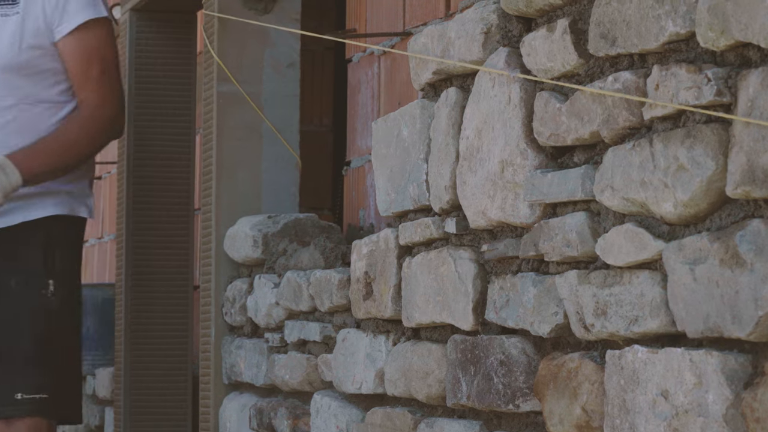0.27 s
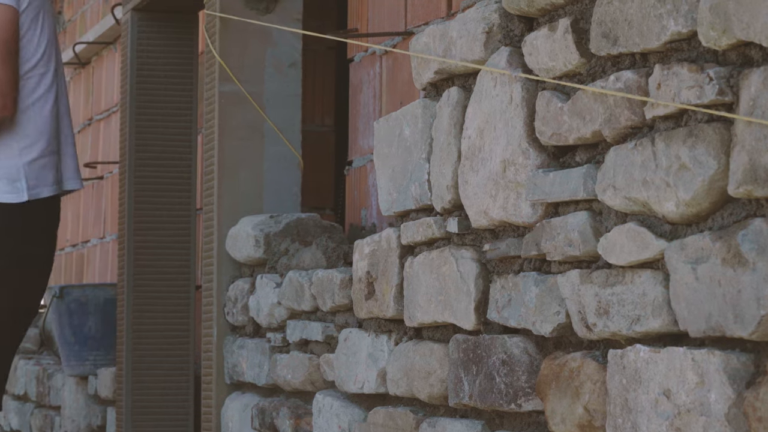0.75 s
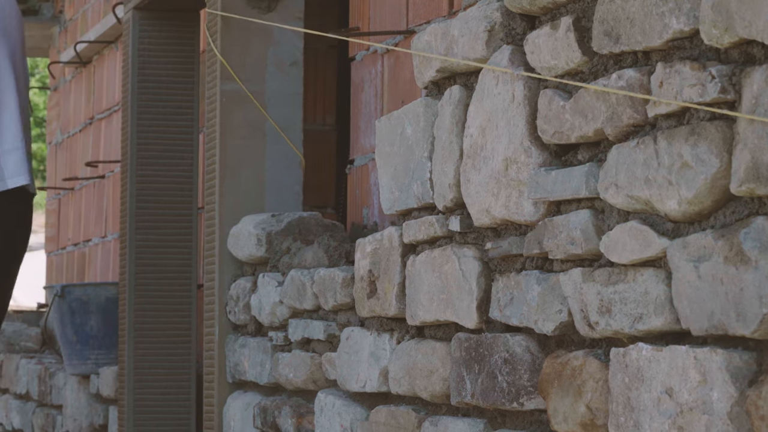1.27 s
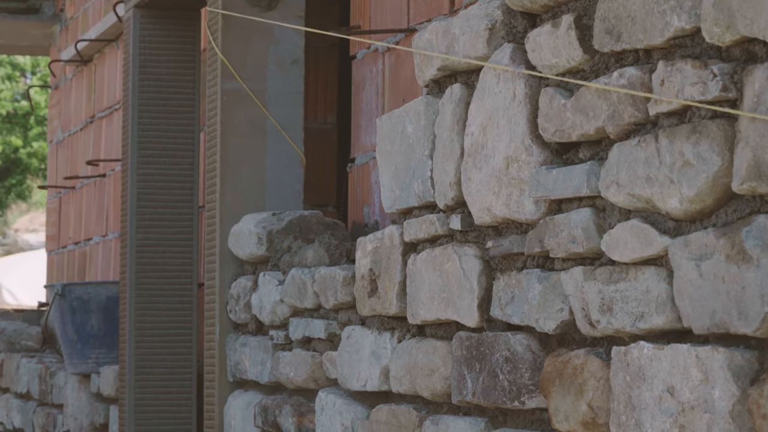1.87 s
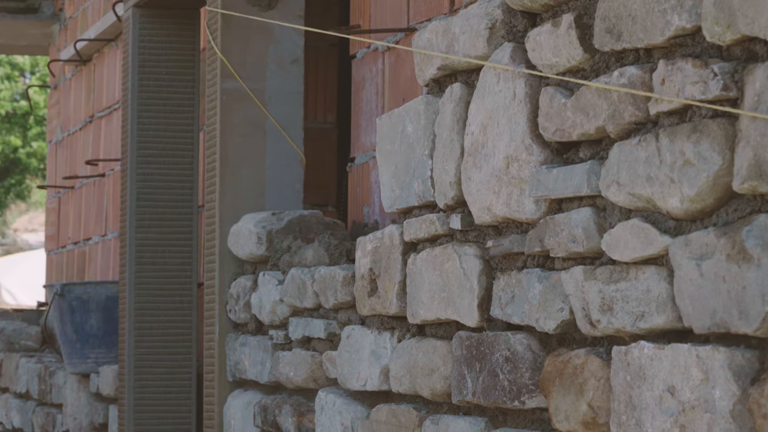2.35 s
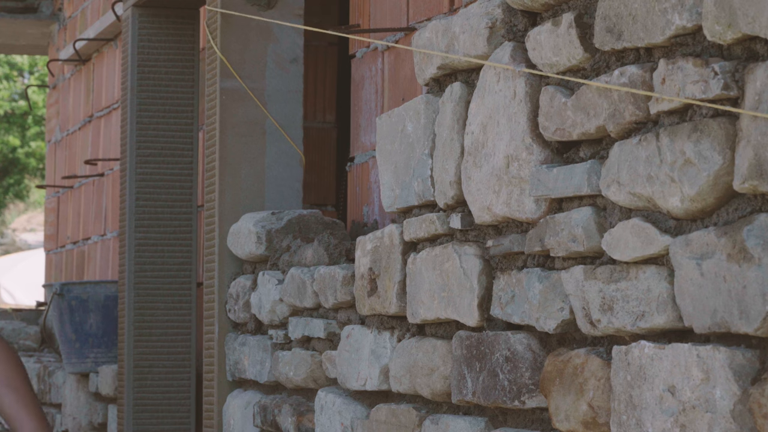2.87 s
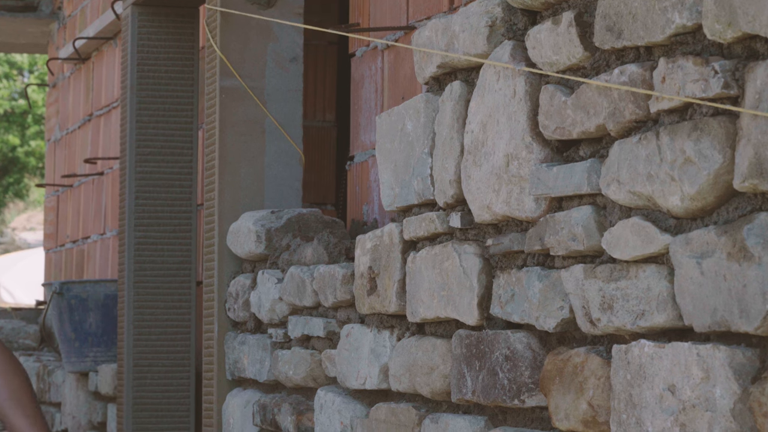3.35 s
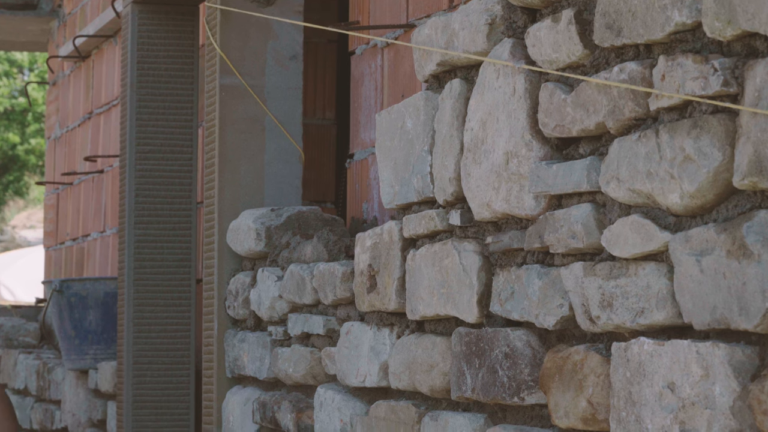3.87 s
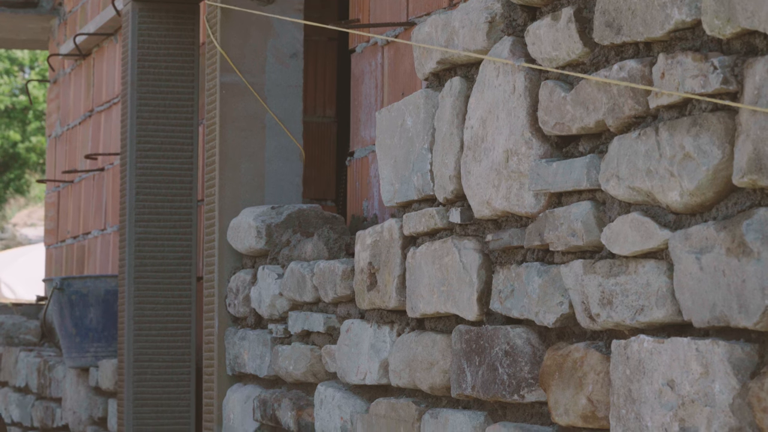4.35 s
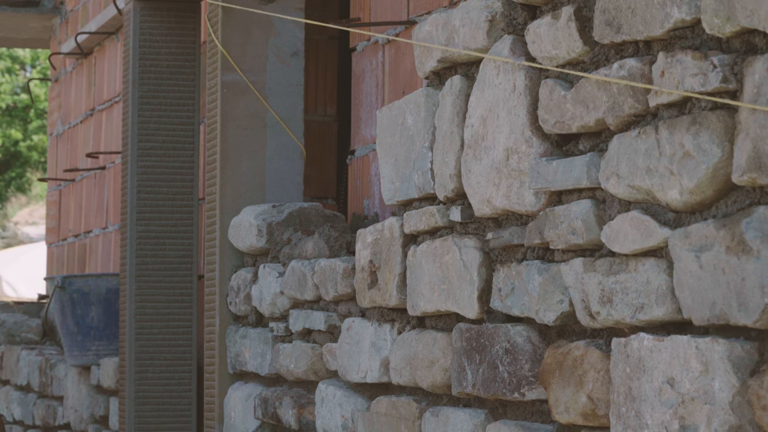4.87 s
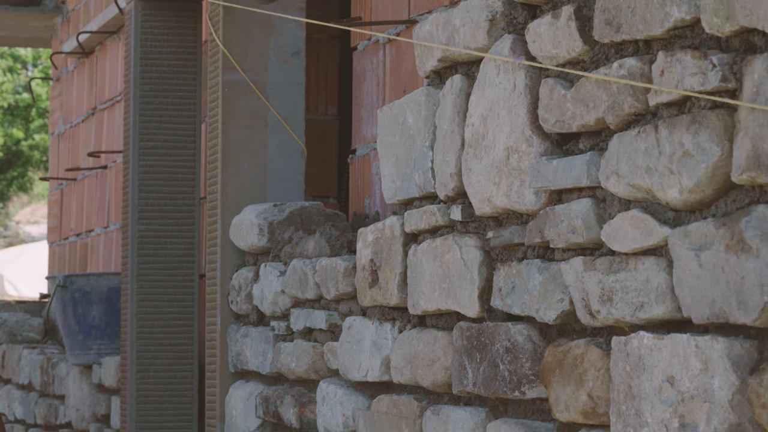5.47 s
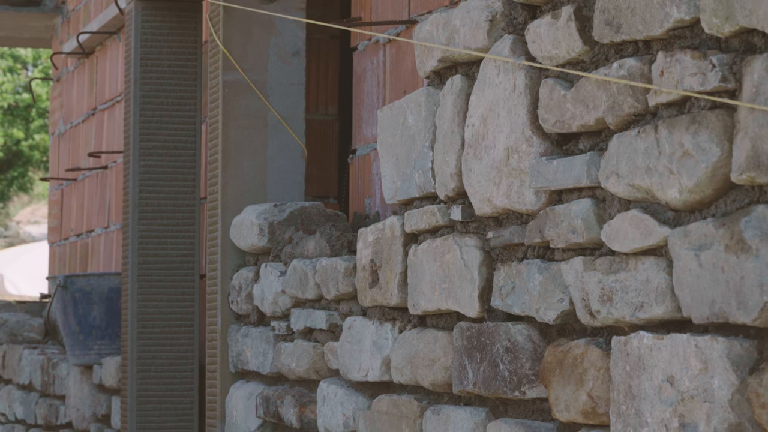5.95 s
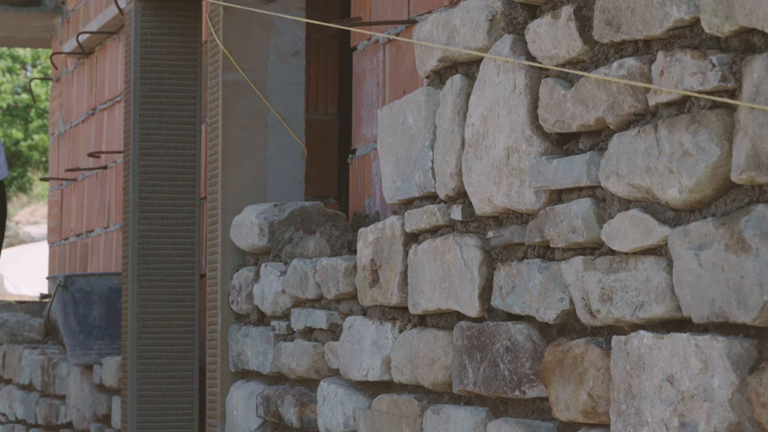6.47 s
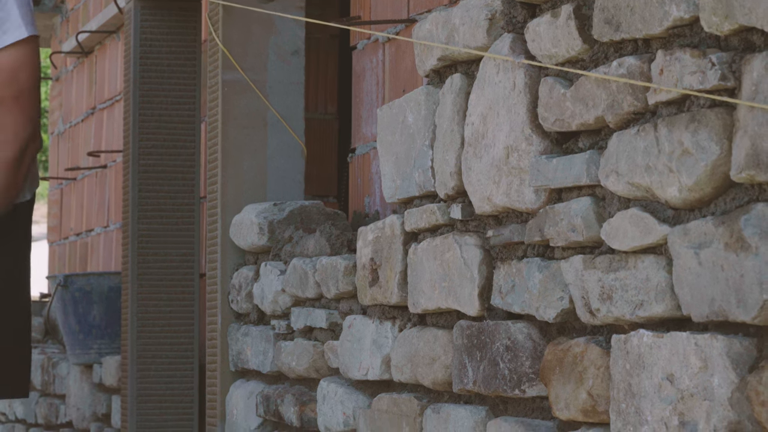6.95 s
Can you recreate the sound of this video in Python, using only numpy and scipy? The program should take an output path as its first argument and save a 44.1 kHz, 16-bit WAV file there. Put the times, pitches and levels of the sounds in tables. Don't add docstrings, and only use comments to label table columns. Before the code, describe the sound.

Quiet outdoor site hush, then heavy stones crack and thump sharply together, with gritty scrapes, chattering chips, pattering sand and small trowel clinks.

```python
import sys
import numpy as np
from scipy import signal
from scipy.fft import rfft, irfft, next_fast_len
from scipy.io import wavfile
from scipy.ndimage import uniform_filter1d, map_coordinates

SR = 44100
rng = np.random.default_rng(int(sys.argv[2]) if len(sys.argv) > 2 else 0)


def makeup_ratio(level_db):
    decades = np.asarray(level_db, float) / 20
    return 10 ** decades


def master_out(mix):
    frames = np.transpose(np.atleast_2d(mix))
    ceiling = np.clip(frames, -1, 1)
    pcm = np.round(ceiling * 32767).astype(np.int16)
    wavfile.write(sys.argv[1], SR, pcm)


N = 317961
T = np.arange(N) / SR

# (frequency [Hz], level [dB])
SITE_COLOUR = [(15, -79.5), (25, -33.5), (156, -7), (188, -6.5), (1110, -4), (1760, -3), (2240, -6.5),
               (4170, -9), (6410, -9.5), (7960, -10), (15600, -14)]
# (frequency [Hz], level [dB rms])
WHINES = [
    (1774, -74),
    (7698, -75),
    (9469, -84),
    (3545, -80),
]
# (frequency [Hz], likeness [-1 to 1]),
# (frequency [Hz], left over right [dB]), left lead [ms]
SITE_STEREO = [(60, 0.7), (130, 0.94), (290, 1), (640, 0.61), (1410, -0.093), (3100, -0.39), (6820, -0.08),
               (15000, 0.0094)], [(100, 0.036), (10000, 0.18)], 0
PILE_STEREO = [(100, 1.5), (600, 1.5), (1200, 0.67), (3000, 0.37), (15000, 0.08)], [(300, 0.5), (700, 1.5),
               (1300, 4.5), (2400, 2), (5000, 2.5), (15000, 0.5)], 0.094
SAND_STEREO = [(100, 1), (600, 1), (1500, 0.88), (5000, 0.098), (15000, 0.14)], [(60, 1.8), (110, 0.5),
               (200, 1.2), (380, 2.5), (700, 5.5), (1290, 20.4), (2380, 3.1), (4400, 1.0), (8120, 5.3),
               (15000, 3.3)], 0.197

# (time [s], held [s], level [dB], grit [dB], settling t60 [s])
PULLS = [(0.33, 0.13, -55, 2.5, 2.8), (0.89, 0.012, -45.5, 1, 0.25), (1.56, 0.16, -58.5, 9, 1.1),
         (1.93, .02, -53, -2, 0.27), (2.069, 0.06, -51, 6, 0.44), (2.6, 0.27, -54, 2, 0.74),
         (2.92, 0.1, -33.5, -9, 0.17), (3.133, .13, -32, -13.5, 0.3), (3.369, 0.056, -13, -7, 0.88),
         (3.656, .13, -17, -3.5, 0.31), (3.85, 0.021, -39, -19, 3.1), (4.6, 0.054, -23, -13.5, 0.24),
         (4.86, 0.13, -31.5, -10.5, 0.4), (4.97, 0.011, -20, -12.5, 0.2), (5.11, 0.27, -46.5, -8.5, .5),
         (5.319, 0.026, -8.5, -26, 0.14), (5.38, 0.03, -38, -6, .3), (5.46, 0.015, -30.5, 0, 0.44),
         (5.6, 0.27, -45, -3.5, 0.62), (5.88, 0.037, -29, -29, 0.21), (5.94, 0.022, -28.5, -26, 0.3),
         (6.15, 0.48, -48, -6, 1), (6.8, 0.23, -43.5, -5, 1.26)]
# (time [s], peak level [dB], grit [dB], weight [dB])
LANDINGS = [(0.322, -33.5, -19, -6), (1.674, -36, -17, -9), (2.95, -30, -14, -16),
            (3.001, -32.5, -10.5, 11.5), (3.037, -29.5, -24, 1.5), (3.156, -27.5, -31, 2),
            (3.179, -30.5, -28, 6), (3.359, 1.5, -12, -11.5), (3.402, -7.5, -7.5, -6), (3.475, -15, -9, -8),
            (3.638, -14.5, -40, -1.5), (3.669, -23, -8, -8), (3.676, -9, -6.5, -14),
            (3.775, -4.5, -15.5, -37), (3.788, -25, -14.5, -26), (4.597, -14, -23, -6.5),
            (4.629, -21.5, -31, -1), (4.676, -20, -40, -2.5), (4.793, -20.5, -36, -3),
            (4.885, -23, -13.5, -5.5), (4.965, -18.5, -31, 2.5), (5.112, -22, -22, -28),
            (5.14, -25.5, -18, 0.5), (5.201, -27.5, -30, -12), (5.305, -17, -33, -17),
            (5.318, -3.5, -14.5, -12.5), (5.326, -7, -12, -22), (5.358, -14, -12, -27),
            (5.429, -15.5, -37, -10), (5.879, -27.5, -31, 7.5), (5.941, -20.5, -22, -2)]
# (time [s], peak level [dB], grit [dB], t60 [s])
LIGHT_TAPS = [(0.141, -40.5, -28, 0.27), (0.177, -37, -10, 0.25), (0.462, -39, -26, 0.51),
              (0.569, -47, -15, 0.24), (0.88, -38, -8, 0.61), (1.081, -41.5, -8, 0.68),
              (1.558, -39, -27, 0.21), (1.609, -33.5, -16.5, 0.32), (1.922, -35.5, -6, 0.26),
              (2.648, -49.5, -2, 1), (2.761, -40, -25, 0.58), (3.229, -33.5, -8.5, 0.44),
              (3.546, -18, -13, 0.2), (4.755, -36.5, -7.5, 0.52), (5.257, -33, -18.5, 0.93),
              (6.36, -53.5, 7.5, 0.72), (6.434, -43.5, 3, 0.23), (6.587, -48.5, 1.5, 0.4),
              (6.753, -48, 0, 1), (6.856, -26, -12, 0.073), (7.055, -33.5, 0.5, 0.39),
              (7.188, -36, -8, 0.24)]
# (frequency [Hz], level [dB])
STONE_COLOUR = [(30, -89), (130, -46), (220, -9), (320, -7.5), (500, -4.5), (800, -2), (1150, -4.5),
                (1600, -12), (2300, -22), (3500, -42.5), (9000, -55)]
# (frequency [Hz], level [dB])
GRIT_COLOUR = [(100, -86), (900, -23), (1900, 7.5), (2600, 5), (3200, 2), (5500, 3), (7500, -6),
               (10000, -11.5), (16000, -22.5)]
# (frequency [Hz], level [dB])
THUMP_COLOUR = [(30, -80), (100, -45), (180, -22), (245, -1), (330, 0), (480, -20), (1000, -50)]
# (time [s], peak level [dB], stone frequency [Hz], t60 [s])
CLEAN_KNOCKS = [(0.175, -39, 926, 0.096), (0.322, -38, 502, 0.13), (0.569, -44, 930, 0.2),
                (0.88, -36.5, 1090, 0.11), (1.675, -39, 340, 0.082), (1.92, -35.5, 902, 0.1),
                (3.155, -23.5, 910, 0.064), (3.207, -19, 870, 0.049), (3.36, 0, 760, 0.062),
                (3.674, -10, 927, 0.1), (4.598, -22, 1086, 0.17), (4.678, -18, 926, 0.096),
                (4.791, -22.5, 952, 0.068), (4.967, -12.5, 812, 0.065), (5.32, -6, 842, 0.11),
                (5.428, -17.5, 800, 0.08), (5.879, -20, 890, 0.1), (5.94, -12, 754, 0.063),
                (6.171, -32, 766, 0.035), (6.855, -19.5, 960, 0.03), (6.872, -25, 1080, 0.024),
                (6.909, -38, 824, 0.085), (6.951, -30, 950, 0.04), (7.023, -37, 480, 0.078),
                (5.943, -21.5, 331, 0.094), (5.966, -17.5, 960, 0.044), (5.886, -30, 327, .15),
                (3.398, -9, 460, .04), (4.715, -23, 805, 0.056), (4.985, -10, 612, 0.056),
                (5.003, -24, 890, 0.046), (5.4, -19, 450, 0.1), (5.942, -17.5, 562, 0.099),
                (0.91, -39, 890, .06), (0.943, -37, 855, .06), (3.745, -13, 890, 0.077),
                (5.258, -35, 890, .04)]

# (time [s], level [dB], shake [s], t60 [s])
GROUND_SHAKES = [
    (3.361, -30, 0.024, 0.17),
    (0.33, -57, 0.036, .3),
    (3.36, -35.5, .05, 1.9),
    (3.67, -46, .15, 1.4),
    (4.6, -52.5, .5, 1),
    (5.32, -45, 0.025, 1.4),
    (5.9, -55, .05, 0.89),
    (2.95, -61, 0.33, .5),
]
# (frequency [Hz], level [dB])
GROUND_COLOUR = [(40, -42), (90, -15), (140, -5), (200, -1), (300, -4), (600, -7), (1500, -31), (4000, -74)]
# (time [s], level [dB], frequency [Hz], push [s], t60 [s])
AIR_PUSHES = [(.5, -68, 60, .06, .2), (.68, -66, 75, .13, .2), (1.56, -70, 70, .05, .2),
              (2.08, -70, 50, .05, .2), (3.03, -68, 65, .06, .2), (7.06, -66, 80, .05, .2)]

# (time [s], level [dB], spray [s], t60 [s], fineness [0-1])
SAND_FALLS = [(1.6, -51.5, 0.06, 0.16, 0.3), (2.06, -23, 0.05, 0.15, 0.39), (4.05, -51.5, 0.063, 0.16, 0),
              (4.37, -55.5, .12, 0.32, 0), (5.44, -21.5, 0.055, 0.17, 0.5), (6.31, -51, 0.06, .2, .1),
              (6.375, -50, 0.069, 0.33, 0.6), (7.054, -37, 0.017, 0.04, 0.94), (6.4, -46, .004, .07, 0.8),
              (7.148, -41, 0.0015, 0.0097, 0.7), (2.1, -56, 0.057, 0.12, 0), (.76, -56, 0.053, 0.17, 0.1),
              (1.07, -57, .02, .1, .6)]
# (frequency [Hz], level [dB])
SAND_COLOUR = [(200, -82), (500, -6.5), (1050, -15), (1400, -4), (2400, 2.5), (2900, -2), (3150, -13),
               (3400, -4), (4800, -7), (6500, 0), (8500, 0), (11000, -6), (13800, -13), (16000, -9.5)]
# (time [s], level [dB],
# frequency [Hz], chatter [s], t60 [s])
STONE_CHIPS = [(.875, -54, 5300, .01, 0.056), (1.1, -60, 2600, .02, 0.055), (1.7, -58, 3480, .03, 0.11),
               (2.062, -41, 1750, 0.021, 0.025), (2.08, -43, 1300, 0.032, 0.044),
               (2.07, -43, 2750, .04, .03), (2.062, -40, 3430, .03, 0.032), (2.57, -57, 620, .05, .06),
               (3.36, -19, 1310, .012, 0.055), (3.366, -21.5, 1870, 0.044, 0.02),
               (3.415, -21, 291, 0.03, 0.056), (3.396, -19, 620, 0.022, 0.046),
               (3.394, -13, 399, 0.014, 0.048), (3.41, -17, 1020, 0.018, 0.031),
               (3.364, -13, 1100, .012, .05), (3.41, -25, 1640, 0.025, 0.058),
               (3.44, -23.5, 2035, 0.037, 0.017), (3.47, -23.5, 1336, 0.021, 0.053),
               (3.549, -30.5, 2120, .012, 0.031), (3.549, -32.5, 4270, 0.0081, .04),
               (3.681, -19, 1430, 0.013, 0.036), (3.772, -32, 1866, 0.013, 0.086),
               (4.599, -29.5, 1640, .012, 0.052), (4.602, -31.5, 1920, 0.028, 0.045),
               (4.886, -44, 1320, 0.036, 0.085), (5.142, -52, 2650, 0.0083, .05),
               (5.142, -49, 1360, 0.009, 0.071), (5.256, -59, 1760, 0.009, .05),
               (5.304, -28, 1000, 0.0093, 0.033), (5.318, -10, 1630, 0.0062, 0.025),
               (5.322, -25.5, 6510, 0.008, .015), (5.324, -25.5, 2880, 0.031, 0.015),
               (5.326, -25, 1402, 0.013, 0.037), (5.322, -18.5, 2030, 0.0122, 0.03),
               (5.335, -16, 1700, .01, .03), (5.324, -12.5, 858, 0.022, 0.064),
               (5.355, -28, 2000, .025, 0.023), (5.36, -20.5, 748, 0.014, 0.05),
                (5.429, -23.5, 1050, 0.0067, 0.048)]
# (time [s], flex [dB], edge [dB], tip [dB], rub [s])
TROWEL_TOUCHES = [(3.221, -43, -53, -56, 0.056), (4.757, -65, -53, -51.5, 0.046),
                  (6.434, -47.5, -47, -47, 0.048), (6.604, -40, -67, -73, 0.035),
                  (6.753, -47.5, -52.5, -43.5, 0.046)]
# (frequency [Hz], level [dB], t60 [s])
BLADE_NOTES = [
    [(576, -13, .07), (1270, 0, .15), (2080, -9, .05)],
    [(3940, 0, .08), (4190, -3, .11)],
    [(5330, 0, .06), (5550, -3, .04), (5820, -7, .05), (8400, -19, .08)],
]
# (time [s], level [dB], frequency [Hz], rattle [s], t60 [s])
LOOSE_METAL = [(3.36, -38, 15350, .046, .075), (3.36, -41, 4530, .11, .1), (3.36, -41, 4020, .1, .15),
               (3.378, -25, 5440, .02, .04), (3.397, -21, 5450, .016, .04), (3.385, -31, 5290, .03, .03),
               (3.438, -26, 5500, .02, .03), (3.46, -42, 7000, .02, .1), (3.46, -26, 5430, .014, .03),
               (3.675, -22, 5500, .006, .034), (3.675, -27, 5750, .006, .03),
               (3.675, -33, 7050, .0073, .11), (3.695, -26, 6000, .009, .055),
               (3.767, -28, 7070, .011, .097), (3.767, -23, 5480, .006, .022),
               (3.767, -27, 5800, .006, .03), (3.77, -37, 4480, .07, .25), (3.81, -46, 6270, .036, .52),
               (3.82, -53, 890, .03, 8), (3.85, -54, 2500, .03, .4), (4.599, -31, 2300, .012, .05),
               (4.758, -51, 3950, .02, .05), (4.9, -55, 3690, .05, .15), (4.99, -50.5, 11500, .019, .083),
               (4.99, -54, 5620, .025, .037), (5.113, -26, 800, .005, .07), (5.114, -48, 2600, .008, .04),
               (5.15, -59, 2640, .04, .08), (5.203, -47, 2460, .016, .04), (6.685, -54, 1270, .03, .15),
               (6.755, -55, 4480, .03, .15)]
# (time [s], level [dB], frequency [Hz], chatter [s], t60 [s])
BRUSHED_PEBBLES = [(6.3, -51.5, 484, .02, .07), (6.36, -59, 1690, 0.022, 0.044),
                   (6.41, -51, 2860, 0.017, .05), (6.595, -51, 3910, .02, .12),
                   (6.598, -48, 1700, .02, .03), (6.436, -46.5, 2010, 0.044, 0.082),
                   (6.45, -52, 4150, .03, .12), (6.76, -51, 2200, .04, .08), (6.591, -50, 1500, .012, .04),
                   (7.058, -49, 5860, .012, .04), (7.058, -45.5, 3530, .012, .04),
                   (7.058, -41, 4220, 0.013, .05)]

# (frequency [Hz], t60 [s])
ECHO_TIMES = [(80, 0.47), (130, 0.86), (300, 1), (1000, 0.36), (3000, 0.39), (10000, 0.38)]
# (frequency [Hz], level [dB])
BAND_LIMITS = [(25, -14), (70, -4), (130, -0.5), (15650, 0), (15900, -33), (16400, -43.5), (16500, -90)]


def unit(x):
    return x / np.sqrt(np.mean(x ** 2) + 1e-20)


def along(points, hz):
    f, v = np.transpose(points)
    return np.interp(np.log(hz + 1), np.log(f + 1), v)


def wobble(rate):
    knots = rng.standard_normal(int(N * rate / SR) + 4)
    return map_coordinates(knots, [T * rate])


def causal(spectrum, hz):
    cepstrum = irfft(np.log(makeup_ratio(along(spectrum, hz)) + 1e-6))
    half = len(cepstrum) // 2
    cepstrum[1:half] *= 2
    cepstrum[half + 1:] = 0
    gain = np.exp(rfft(cepstrum))
    return gain / np.sqrt(np.mean(np.abs(gain) ** 2))


def patchy(patchy_db, wide, long):
    z = signal.stft(rng.standard_normal((2, N)), nperseg=1024)[2]
    field = rng.standard_normal(z.shape[1:])
    field = uniform_filter1d(field, wide, 0)
    field = uniform_filter1d(field, long, 1)
    noises = signal.istft(z * makeup_ratio(patchy_db * unit(field)), nperseg=1024)[1]
    return unit(noises[:, :N])


def heard(pair, spectrum, ears):
    m = 2 * next_fast_len(N // 2 + SR // 4)
    hz = np.fft.rfftfreq(m, 1 / SR)
    alike, balance_db = along(ears[0], hz), along(ears[1], hz)
    lead = 2 * np.pi * hz * ears[2] / 1000
    turn = np.arccos(np.clip(alike, -1, 1)) / 2
    shared, apart = rfft(pair, m) * causal(spectrum, hz) * [np.cos(turn), np.sin(turn)]
    side = makeup_ratio(balance_db / 2) * np.exp(.5j * lead)
    return irfft(np.array([(shared + apart) * side, (shared - apart) / side]), m)[:, :N]


def burst(t, hold, t60, rise):
    t = np.maximum(t, 0)
    return (1 - np.exp(-t / abs(rise))) * makeup_ratio(-60 * np.maximum(t - hold, 0) / max(t60, .01))


def rattled(s, db, hz, rub, t60):
    t = T[:int(SR * min(rub + t60, 1.2))]
    taps = rng.standard_normal((2, 6000))[:, :max(int(rub * SR), 8)]
    taps *= np.linspace(1, .35, taps.shape[1])
    alike = max(1 - (hz / 4000) ** 2, .75)
    taps[1] = alike * taps[0] + np.sqrt(1 - alike ** 2) * taps[1]
    drift = np.cumsum(rng.standard_normal(SR * 6 // 5)[:len(t)])
    drift = drift * .006 * np.sqrt(hz / 220 + (550 / hz) ** 3)
    fade = makeup_ratio(-60 * t / max(t60, .01)) * (1 - t / t[-1])
    note = fade * np.sin(2 * np.pi * hz * t + drift)
    tone = signal.fftconvolve(taps, note[None], axes=1)
    return int(s * SR), 2 * makeup_ratio(db) * tone / np.abs(tone).max()


def rattles(notes):
    out = np.zeros((2, N + 2 * SR))
    for note in notes:
        i, tone = rattled(*note)
        out[:, i:i + tone.shape[1]] += tone
    return out[:, :N]


def site():
    drift_db = 0.45 * wobble(2.7) + 0.3 * wobble(11)
    air = makeup_ratio(-54 + drift_db) * heard(patchy(1.0, wide=12, long=8), SITE_COLOUR, SITE_STEREO)
    whines = 0
    for hz, db in WHINES:
        level = np.sqrt(2) * makeup_ratio(db + 1.5 * wobble(5))
        whines = whines + level * np.sin(2 * np.pi * hz * T + .5 * wobble(8))
    return air + whines


def stones():
    thump_db = -16.5
    power = makeup_ratio(-61 + np.array([[0], [-21], [thump_db]]) + 0 * T) ** 2
    for s, held, db, grit_db, t60 in PULLS:
        i = int(s * SR)
        pull = burst(T[i:][:2 * SR] - s, held, t60, rise=0.27 * held)
        levels = makeup_ratio([[db], [db + grit_db], [db + thump_db]])
        power[:, i:][:, :2 * SR] += (levels * pull) ** 2
    slip_db = 1.4 * wobble(30) + 1.2 * wobble(140)
    power *= makeup_ratio(slip_db - 5.5) ** 2

    knocks = [(*landing, 0.24) for landing in LANDINGS]
    knocks += [(s, db, grit_db, -63, t60) for s, db, grit_db, t60 in LIGHT_TAPS]
    for s, db, grit_db, weight_db, t60 in knocks:
        i, j = int((s - .001) * SR), int((s + .6) * SR)
        t = T[:len(T[i:j])]
        onset = (1 - np.exp(-t / 0.0043)) * (1 + 2 * np.exp(-t / 0.0019))
        # (level [dB], slowness of the fade)
        parts = [(db - 10.0, 1), (db + grit_db - 0.5, .6), (db + weight_db - 11.0, 1.3)]
        for row, (level, slow) in enumerate(parts):
            power[row, i:j] += makeup_ratio(level - 60 * t / (max(t60, .02) * slow)) ** 2 * onset

    ring, crush, thump = np.sqrt(power)
    grains = makeup_ratio(1.1 * wobble(500) + 0.74 * wobble(90))
    rough = unit(makeup_ratio(0.56 * wobble(220)) * patchy(3.1, wide=2, long=4))
    crunch = unit(grains * patchy(2.66, wide=4, long=3))
    out = heard(ring * rough, STONE_COLOUR, PILE_STEREO)
    out = out + heard(crush * crunch, GRIT_COLOUR, PILE_STEREO)
    return out + heard(thump * rng.standard_normal((2, N)), THUMP_COLOUR, PILE_STEREO)


def clacks():
    out, t = np.zeros(N + SR), T[:SR // 5, None]
    scatter = rng.standard_normal((len(CLEAN_KNOCKS), 10))
    for (s, db, hz, t60), chance in zip(CLEAN_KNOCKS, scatter):
        detune = 1 + 0.0287 * chance[:5] * [0, 1, 1, 1, 1]
        modes = hz * np.array([1, 0.9, 1.4, 1.3, 2.3]) * detune
        levels = np.array([-4, -9, -10, -16, -24]) + 2 * chance[5:]
        fade = makeup_ratio(db + levels - 60 * t * np.sqrt(modes / hz) / max(t60, .02))
        ring = fade * np.sin(2 * np.pi * modes * t)
        out[int((s - .001) * SR):][:len(t)] += (ring * (1 - np.exp(-t / .0007))).sum(1)
    return np.array([makeup_ratio(-2.5) * out[4:N + 4], makeup_ratio(-1.7) * out[:N]])


def ground():
    shake = sum(makeup_ratio(db) * burst(T - s, held, t60, rise=.006) for s, db, held, t60 in GROUND_SHAKES)
    rumble = shake * makeup_ratio(1.4 * wobble(25)) * rng.standard_normal((2, N))
    return heard(rumble, GROUND_COLOUR, SITE_STEREO)


def breeze():
    return rattles(AIR_PUSHES)


def sand():
    falls = np.array([makeup_ratio(db) * burst(T - s, hold, t60, rise=min(0.0031, hold / 12))
                      for s, db, hold, t60, _ in SAND_FALLS])
    fine = np.clip([row[-1] for row in SAND_FALLS], 0, 1) @ falls
    patter = unit(makeup_ratio(0.28 * wobble(820) + 2.0 * wobble(60)) * patchy(2.9, wide=5, long=6))
    spray = falls.sum(0) * patter - fine * np.roll(patter, 1, axis=1)
    return heard(spray, SAND_COLOUR, SAND_STEREO)


def steel_and_chips():
    notes = [*LOOSE_METAL, *STONE_CHIPS, *BRUSHED_PEBBLES]
    for s, *parts_db, rub in TROWEL_TOUCHES:
        for db, part in zip(parts_db, BLADE_NOTES):
            notes += [(s, db + level, hz, rub, t60) for hz, level, t60 in part]
    return rattles(notes) * makeup_ratio([[.4], [-.4]])


def shell(x):
    hz, t, z = signal.stft(rng.standard_normal((2, SR)), SR, nperseg=256)
    fade = makeup_ratio(-60 * t / along(ECHO_TIMES, hz)[:, None])
    tail = signal.istft(z * fade, SR, nperseg=256)[1]
    colour = [(70, -23), (140, -6), (250, -2.0), (3000, 9.0), (12000, -4.5)]  # (Hz, dB)
    tail = heard(np.pad(tail, ((0, 0), (500, N))), colour, SITE_STEREO)[:, :SR]
    return signal.fftconvolve(x.mean(0)[None], tail / np.linalg.norm(tail[0]), axes=1)[:, :N]


def scene():
    work = stones() + clacks() + sand() + steel_and_chips()
    work = signal.sosfilt(signal.butter(4, 175, "high", fs=SR, output="sos"), work)
    return work + makeup_ratio(-13.5) * shell(work) + site() + breeze() + ground()


def band_limit(x):
    return signal.sosfilt(signal.butter(12, 16460, fs=SR, output="sos"), x)


def record(dry):
    held = dry / (1 + np.abs(dry / 1.05) ** 12) ** (1 / 12)
    m = 2 * next_fast_len(N // 2 + 2048)
    hz = np.fft.rfftfreq(m, 1 / SR)
    both = rfft(held, m) * makeup_ratio(along(BAND_LIMITS, hz))
    middle = both.mean(0)
    both = middle + (both - middle) / (1 + (245 / (hz + 1)) ** 8)
    return band_limit(irfft(both, m)[:, :N])


dry = scene()
out = record(dry)
master_out(out)
```